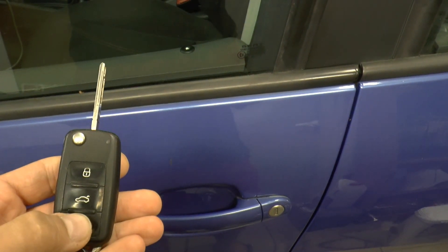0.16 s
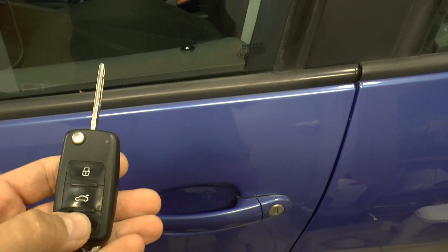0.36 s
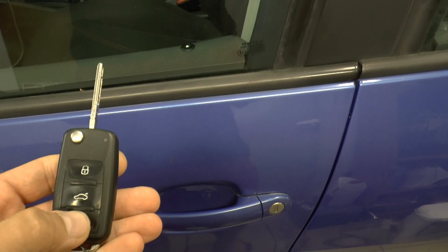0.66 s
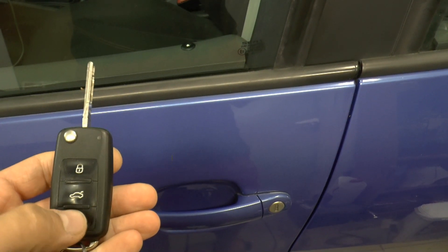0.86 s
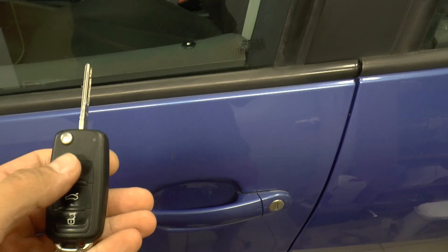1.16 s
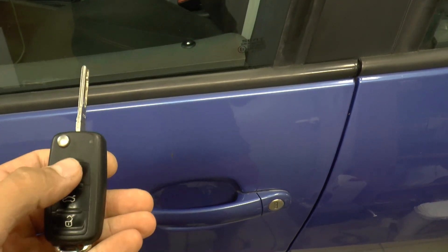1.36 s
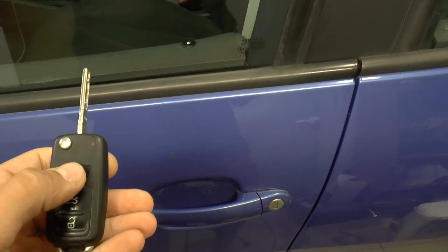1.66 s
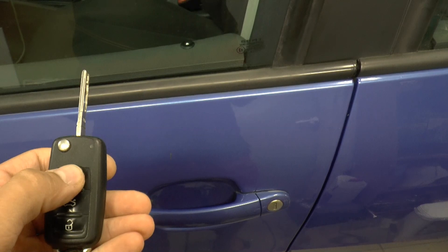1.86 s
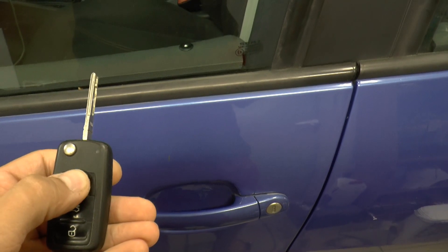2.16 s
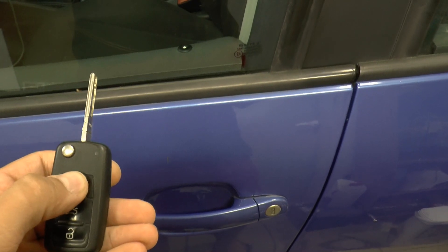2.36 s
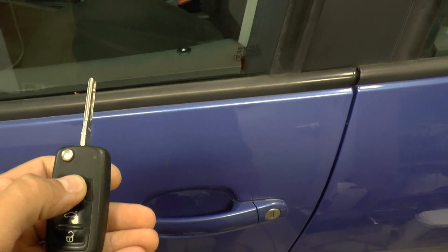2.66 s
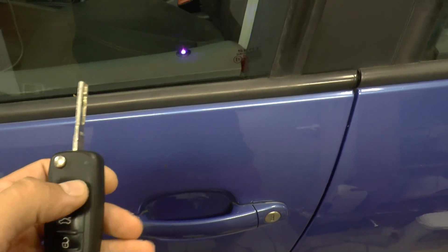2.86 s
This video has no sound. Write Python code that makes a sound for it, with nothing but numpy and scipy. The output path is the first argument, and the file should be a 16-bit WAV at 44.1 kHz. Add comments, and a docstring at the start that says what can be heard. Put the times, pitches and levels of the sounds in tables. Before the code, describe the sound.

Car door locks throw with a loud, sharp clunk at about 0.25 seconds, a tight cluster of knocks and gear rattle with a short hollow metal ring, after the tail of an earlier stroke. Quiet hush, hiss and faint electrical tones follow, with soft hand thumps near 1.8 and 2.0. A plastic button ticks at 2.1, then locks clunk again at 2.38 and 2.69, ending with a faint knock at 2.9.

```python
"""Central locking of a parked car, heard in stereo beside the door on a hand-held camera.
Lock motors throw their latches in two bursts: gears rattle, rods knock on their stops, the door panel rings on.
Rattle and knocks are pulses sent through noise and modes of each door, with a faint late echo of the yard.
The key's button ticks near the microphone and the hand thumps the camera, as decaying modes.
Under it lie a quiet outdoor hush and the camera's hiss, as shaped noise, and faint steady electrical tones."""
import sys
import numpy as np
from scipy import signal
from scipy.fft import rfft, irfft, next_fast_len
from scipy.io import wavfile

SR = 44100
rng = np.random.default_rng(int(sys.argv[2]) if len(sys.argv) > 2 else 0)


def digitize_waveform(pressure):
    """Quantize a signal to 16-bit integers and store it at the path in sys.argv[1].

    Rows of a 2-D input are taken as channels; values are limited to [-1, 1].
    """
    field = np.atleast_2d(pressure).T
    bounded = np.clip(field, -1, 1)
    quanta = np.round(bounded * 32767).astype(np.int16)
    wavfile.write(sys.argv[1], SR, quanta)


N = 132300

# Strokes of the lock motors
# [t/s, rise/s, hold/s, level/dB, bass re level/dB, treble re level/dB, left minus right/dB]
STROKES = [(-.06, 0.0076, .03, -41, 8.5, -2, 1.5), (0.123, 0.017, 0.04, -47, 13.5, -12, -1),
           (0.234, .003, .007, -28, 3.5, -10, -6.5), (0.247, .008, 0.022, -32, 6.5, 3.5, 3),
           (0.482, 0.004, 0.029, -46.5, 10.5, -19, -1), (2.3526, .003, 0.02, -38.5, 11.5, -7.5, -4.5),
           (2.373, 0.0011, 0.012, -32.5, 6.5, 5.5, -7), (2.379, 0.0022, 0.024, -32, 9.5, 2, 1.5),
           (2.6, 0.0076, 0.027, -42, 11.5, -12, -1.5), (2.654, 0.0064, 0.02, -32, 7.5, -4.5, -6),
           (2.68, 0.0024, 0.006, -22, 9.5, 1.5, 1), (2.702, 0.0019, 0.033, -54, 22.5, 12, 4),
           (2.901, 0.0035, 0.019, -47.5, 12.5, -23, -0.5)]
# Rods knocking on their stops
# [t/s, crack level/dB, treble re crack/dB, level of thud into the panel/dB, contact/s]
KNOCKS = [(-.04, -18, 1, -23.5, 0.0031), (.15, -33.5, 2, -39, 0.0014), (.2405, -5, -8, -37, 0.00036),
          (.2545, 0, 5, -54, 0.001), (.2592, -4, 4, -59, 0.00065), (.2609, 4, -0.5, -30.5, 0.00062),
          (.268, 1, -27, -38, 0.00085), (0.274, -4.5, -17, -47, 0.00069), (.289, -6.5, -20, -32, 0.0059),
          (.492, -45, 4, -39, 0.0016), (2.36, -22.5, 5, -41, 0.00088), (2.3725, -10, 3, -37, .0008),
          (2.3838, 0, 2, -32, .0008), (2.393, -3.5, -21, -35, 0.00075), (2.405, -17, -10, -36.5, 0.0014),
          (2.431, -39, -13, -48, 0.0029), (2.613, -25, -3, -46, 0.00078), (2.664, -13, 0.5, -39, 0.00084),
          (2.685, -10, -3, -37, 0.0017), (2.691, -0.5, -6, -37, 0.0012), (2.698, -8, 6.5, -37, .002),
          (2.73, -32, -3, -35.5, 0.0021), (2.9105, -24.5, 3, -46, 0.002)]
# Share of the left-right difference in bass, middle and treble, one row each [share]
PAN_SHARE = [
    [0.24],
    [1.08],
    [0.74],
]
# Modes of the door panel [f/Hz, relative level/dB, t60/s]
PANEL_MODES = [(77, -19.5, 1.6), (135.7, -11.5, 0.38), (148.1, -13, 0.45), (236.9, -10.5, 0.22),
               (285.8, -4.5, 0.16), (349.7, -13, 0.19), (414.5, 0.5, 0.12), (574.3, -2, .2),
               (686, -16, 0.33), (711.5, -5.5, 0.32), (738, -6.5, 0.28), (816, -5.5, 0.12),
               (1418, 12.5, 0.053), (2000, -2, 0.18)]
# Short ring of the latch [f/Hz, relative level/dB, t60/s]
LATCH_MODES = [(1698, -3, 0.028), (2330, -0.5, 0.025), (2700, -6.5, .03), (4020, -4, .02),
               (6500, -11.5, 0.008)]
# Spectrum of the dense ring of door and latch [f/Hz, relative level per Hz/dB]
DENSE_SPECTRUM = [(40, -26), (75, -22), (123, -3.5), (287, -5.5), (427, -5.5), (496, -20), (548, -12),
                  (760, -2.5), (900, -18.5), (1300, -10.5), (1420, -8.5), (1540, -9), (1700, -3.5),
                  (2380, 0), (4000, -6), (7000, -15), (11000, -23.5), (13500, -31), (14500, -60)]
# Decay of the dense ring [f/Hz, t60/s]
DENSE_T60 = [(60, 0.23), (160, 0.38), (420, 0.27), (1100, 0.17), (2900, 0.23), (7700, .2), (14000, .12)]
# Stereo width of the dense ring [f/Hz, side minus mid/dB]
DENSE_SIDE = [(60, 1), (150, -12), (400, -11.5), (1300, -9), (4400, -19), (8100, -6.5), (14000, -11)]
# Spectrum of hush and hiss [f/Hz, relative level per Hz/dB]
HUSH_SPECTRUM = [(25, -13), (45, 0), (75, -1), (110, -3), (200, -2.5), (380, -5), (490, -14), (580, -3),
                 (780, -13.5), (920, -19), (1100, -12), (1400, -17), (1540, -14), (1700, -2.5), (2150, -11),
                 (2520, -12.5), (2770, 0.5), (2950, -10.5), (3250, -1.5), (3400, -17), (3600, -6),
                 (4300, -15), (5000, -17.5), (8000, -20.5), (8950, -23.5), (9250, -16.5), (11800, -16),
                 (14500, -21.5), (15000, -30)]
# Stereo width of hush and hiss [f/Hz, side minus mid/dB]
HUSH_SIDE = [(60, -8), (110, -3.5), (200, 0.5), (380, 3.5), (700, -2), (1290, -10), (2380, -12),
             (4400, -15.5), (8120, -6.5), (15000, -17)]
# Faint steady electrical tones [f/Hz, rms level/dB]
TONES = [(376.8, -85), (624.5, -87.5), (748.3, -86), (812.9, -90), (936.7, -109.5), (1061, -92),
         (1184, -93), (1249, -97.5), (1373, -87), (1626, -82.5), (1723, -83.5), (1809, -86.5), (1933, -87),
         (1997, -90), (2121, -91), (2180, -91), (2309, -84.5), (2557, -93), (2778, -88.5), (3090, -98),
         (3176, -90), (3225, -95), (3526, -85), (3774, -94.5), (3898, -98), (4199, -93.5), (4500, -103.5),
         (4802, -93.5), (5098, -94.5), (5238, -103), (5399, -92.5), (5615, -93.5), (6002, -99),
         (6298, -101.5)]
# Soft thumps of the hand on the camera [t/s, level/dB]
THUMPS = [(1.762, -57.5), (2.001, -53.5)]
# Ticks of the key's button [t/s, level/dB]
TICKS = [(2.1153, -36.5), (2.329, -50.5)]
# Modes of the key's plastic shell [f/Hz, relative level/dB, t60/s]
KEY_MODES = [(2120, 1, 0.0081), (2670, -8.5, 0.0092), (3670, -11, 0.0055), (4910, -10.5, .007),
             (6540, -7, 0.006), (9100, -20, .006), (892, -48, 0.01)]

DOORS = 3
LEAD = 8192  # samples computed ahead of the start, for strokes already under way
RATTLE_HZ, RATTLE_SPREAD_DB = 2604, 12.5  # mean hits per second over all doors; hit sizes within +- spread
STOP_S = .003  # time constant of the fade when a motor stops
KNOCK_PAN_DB = -3.5  # left minus right, before PAN_SHARE
BASS_HZ, TREBLE_HZ = 895, 4800  # crossovers between bass, middle and treble
RADIATES_HZ = 112  # the panel is too small to send out deeper bass
DIRECT_DB, CRACK_T60_S = -3.5, .02  # first crack
LATCH_DB, PANEL_DB = -10, -15
YARD_DB, YARD_T60_S, YARD_HZ = -38.5, 0.99, 2500  # late echo off the surroundings; upper band edge
HUSH_DB, WAVER_DB, WAVER_HZ = -68.5, 0.53, 6.9  # waver: spread, and new random levels per second
THUMP_HZ, THUMP_T60_S = 236, 0.029
TICK_RISE_S = 0.00033
TICK_ECHO_DB, TICK_ECHO_S, TICK_ECHO_T60_S = -11, 0.0046, 0.061  # echo off the car's flank
TOP_HZ = 15600


def undb(db):
    """Turn decibels into an amplitude factor."""
    return 10 ** (np.asarray(db) / 20)


def curve(table, hz):
    """Read a two-column table against frequency on a log axis."""
    table = np.array(table, float)
    return np.interp(np.log(np.maximum(hz, 1)), np.log(table[:, 0]), table[:, 1])


def fade(t, t60):
    """Exponential decay that loses 60 dB in t60 seconds."""
    return np.exp(-np.log(1000) * np.maximum(t, 0) / t60)


def unit(x):
    """Scale to a total energy of one."""
    return x / np.sqrt(np.sum(x ** 2))


def ring(modes, size):
    """Response of a set of modes to one blow; neighbours start in opposite directions."""
    t = np.arange(size) / SR
    out = 0
    for k, (hz, db, t60) in enumerate(modes):
        out = out + (-1) ** k * undb(db) * np.sin(2 * np.pi * hz * t) * fade(t, t60)
    return out


def dense_ring(size, tilt=((1, 0), (2, 0))):
    """Too many modes to count: overlapping bands of noise, each dying at its own rate."""
    t, hz = np.arange(size) / SR, np.fft.rfftfreq(size, 1 / SR)
    shape = undb(curve(DENSE_SPECTRUM, hz))
    shape = shape / np.sqrt(np.mean(shape ** 2)) * undb(curve(tilt, hz))
    noise = rfft(rng.standard_normal(size)) * shape
    out = 0
    for centre in 40 * 2 ** np.arange(0, 9, .5):  # half-octave steps
        band = np.clip(1 - 2 * np.abs(np.log2(np.maximum(hz, 1) / centre)), 0, 1)
        t60 = curve(DENSE_T60, centre)
        level = np.sqrt(2 * np.log(1000) / t60 / SR)  # same energy whatever the decay
        out = out + irfft(noise * band, size) * fade(t, t60) * level
    return out


def door():
    """Stereo response of one door: first crack, latch, dense ring, panel modes and a faint yard echo."""
    size = 2 ** 15
    t = np.arange(size) / SR
    mid = dense_ring(size)
    side = dense_ring(size, DENSE_SIDE)
    crack = unit(dense_ring(size) * fade(t, CRACK_T60_S))
    latch = unit(ring(LATCH_MODES, size))
    panel = unit(ring(PANEL_MODES, size))
    yard_band = signal.butter(1, [YARD_HZ / 3, YARD_HZ], "band", fs=SR)
    yard = signal.lfilter(*yard_band, rng.standard_normal((2, size)))
    yard = unit(yard * fade(t, YARD_T60_S))
    body = mid + undb(DIRECT_DB) * crack + undb(LATCH_DB) * latch + undb(PANEL_DB) * panel
    return body + side * np.array([[1], [-1]]) + undb(YARD_DB) * yard


def rattle_strokes(t):
    """Gear teeth and loose rods hit at random while a motor runs; axes are band, door, side, time."""
    chance = rng.random((3, DOORS, 1, len(t)))
    hits = (chance[0] < RATTLE_HZ / DOORS / SR) * np.sign(chance[1] - .5)
    hits = hits * undb(RATTLE_SPREAD_DB * (2 * chance[2] - 1))
    hits = hits / hits.std() / np.sqrt(DOORS)
    motion = np.zeros((3, 2, len(t)))
    for s, rise, hold, db, bass_db, treble_db, pan_db in STROKES:
        swell = np.clip((t - s) / rise, 0, 1) ** 2
        stop = np.exp(-np.maximum(t - s - rise - hold, 0) / STOP_S)
        band_db = db + np.array([[bass_db], [0], [treble_db]])
        side_db = np.array(PAN_SHARE) * [pan_db / 2, -pan_db / 2]
        motion += undb(band_db + side_db)[..., None] * swell * stop
    return motion[:, None] * hits


def add_knocks(push, t):
    """Add each rod's crack to one door's push in turn; return the softer thuds into the panel."""
    thud = np.zeros(len(t))
    sides = undb(np.array(PAN_SHARE) * [KNOCK_PAN_DB / 2, -KNOCK_PAN_DB / 2])
    for k, (s, db, treble_db, thud_db, contact) in enumerate(KNOCKS):
        band_db = db + np.array([[0], [0], [treble_db]])
        push[:, k % DOORS, :, LEAD + int(s * SR)] += undb(band_db) * sides
        bump = np.cos(np.pi * np.clip((t - s) / contact - .5, -.5, .5)) ** 2
        thud += undb(thud_db) * bump / bump.sum()
    return thud


def locks():
    """Rattle and cracks drive every door, thuds drive the panel modes, and the deep bass is lost."""
    t = (np.arange(N + LEAD) - LEAD) / SR
    push = rattle_strokes(t)
    thud = add_knocks(push, t)
    size = next_fast_len(len(t) + 2 ** 16)
    hz = np.fft.rfftfreq(size, 1 / SR)
    low = 1 / (1 + (hz / BASS_HZ) ** 4)
    high = 1 - 1 / (1 + (hz / TREBLE_HZ) ** 4)
    radiation = signal.freqs([1, 0, 0], [1, np.sqrt(2) * RADIATES_HZ, RADIATES_HZ ** 2], hz)[1]
    bass, middle, treble = rfft(push, size)
    blows = low * bass + (1 - low - high) * middle + high * treble
    heard = sum(blow * rfft(door(), size) for blow in blows)
    heard = heard + rfft(thud, size) * rfft(ring(PANEL_MODES, 2 ** 16), size)
    return irfft(heard * radiation, size)[:, LEAD:LEAD + N]


def hush():
    """Outdoor hush and hiss: shaped noise whose octaves below 8192 Hz waver slightly in level."""
    hz, t = np.fft.rfftfreq(N, 1 / SR), np.arange(N) / SR
    mid, side = rfft(rng.standard_normal((2, N))) * undb(curve(HUSH_SPECTRUM, hz))
    side = side * undb(curve(HUSH_SIDE, hz))
    scale = undb(HUSH_DB) / irfft(mid, N).std()
    out = 0
    for lo in 2. ** np.arange(4, 14):
        band = (hz >= lo) & (hz < 2 * lo)
        walk = np.interp(t * WAVER_HZ, np.arange(64), rng.standard_normal(64))
        m, s = irfft(mid * band, N), irfft(side * band, N)
        out = out + undb(WAVER_DB * walk * (lo < 5000)) * np.array([m + s, m - s])
    return scale * out


def electrical_tones():
    """Faint steady sines, each from a random phase, equal on both sides."""
    t = np.arange(N) / SR
    out = np.zeros(N)
    for (f, db), turn in zip(TONES, rng.random(64)):
        out += undb(db) * np.sqrt(2) * np.sin(2 * np.pi * (f * t + turn))
    return out


def place(rows, shape):
    """Lay one sound at every listed time and level."""
    out = np.zeros(N + len(shape))
    for s, db in rows:
        start = int(s * SR)
        out[start:start + len(shape)] += undb(db) * shape
    return out[:N]


def hand_thumps():
    """The hand thumps the camera softly: two short, low modes."""
    return place(THUMPS, ring([(THUMP_HZ, 0, THUMP_T60_S), (3.1 * THUMP_HZ, -8, .02)], 4096))


def key_ticks():
    """The button sets its plastic shell ringing near the microphone and echoes off the car."""
    t = np.arange(4096) / SR
    tick = ring(KEY_MODES, 4096) * np.clip(t / TICK_RISE_S, 0, 1)
    echo = unit(rng.standard_normal(4096) * (t > TICK_ECHO_S) * fade(t, TICK_ECHO_T60_S))
    tick = tick + undb(TICK_ECHO_DB) * signal.fftconvolve(tick, echo)[:4096]
    return place(TICKS, tick)


def scene():
    """Sum the locks, the quiet background and the sounds of the hand."""
    return locks() + hush() + electrical_tones() + hand_thumps() + key_ticks()


def record(dry):
    """The camera cuts the top with a steep low-pass."""
    return signal.sosfilt(signal.ellip(10, .2, 60, TOP_HZ, fs=SR, output="sos"), dry)


dry = scene()
out = record(dry)
digitize_waveform(out)
```